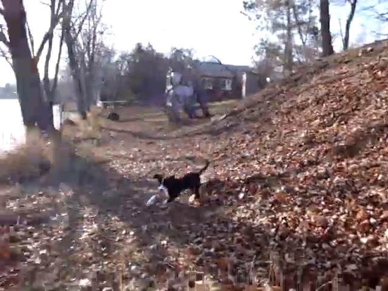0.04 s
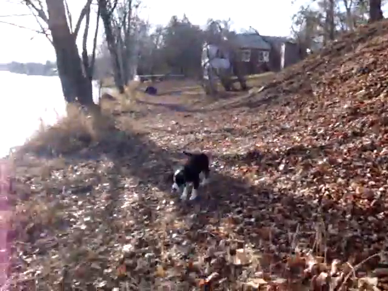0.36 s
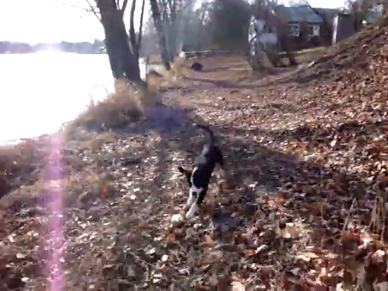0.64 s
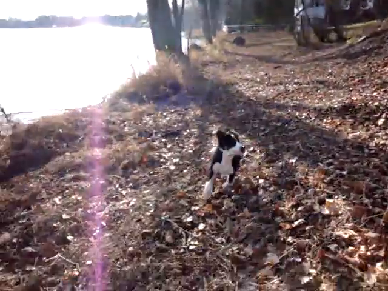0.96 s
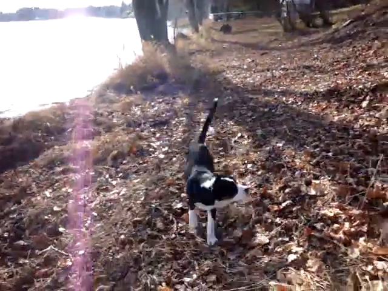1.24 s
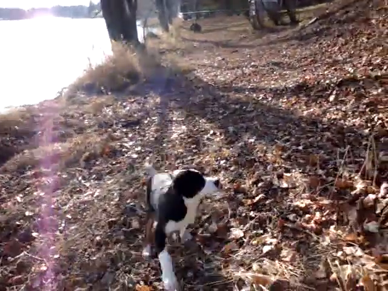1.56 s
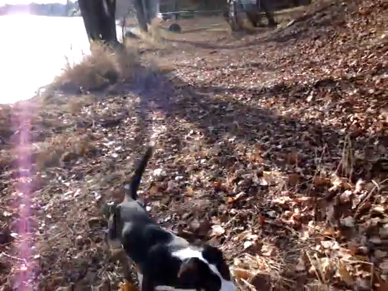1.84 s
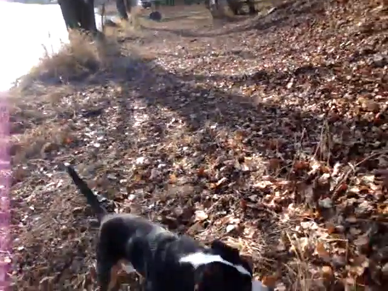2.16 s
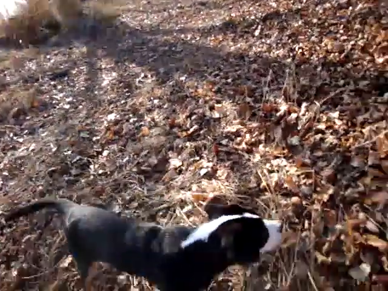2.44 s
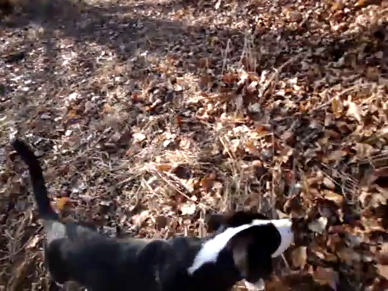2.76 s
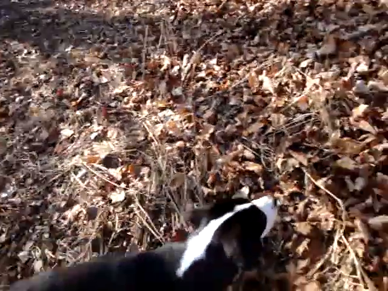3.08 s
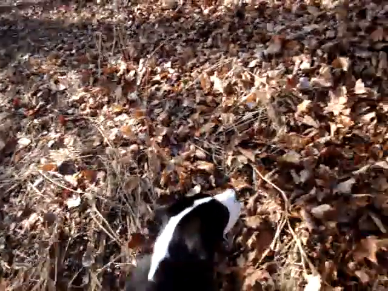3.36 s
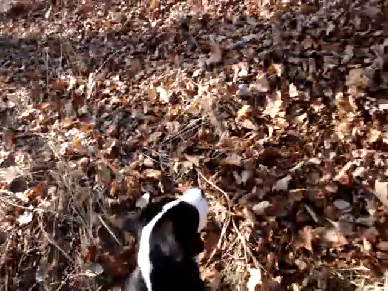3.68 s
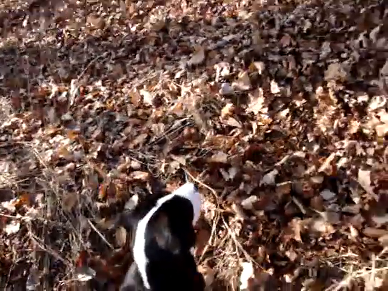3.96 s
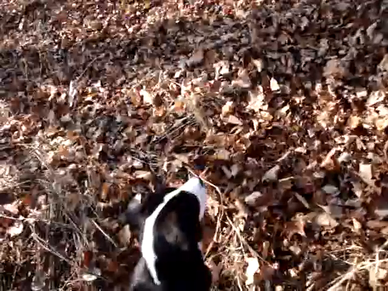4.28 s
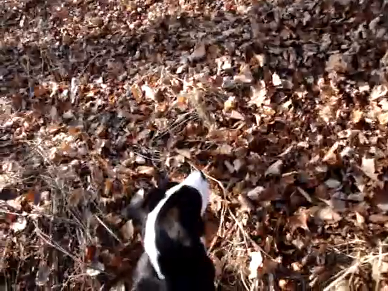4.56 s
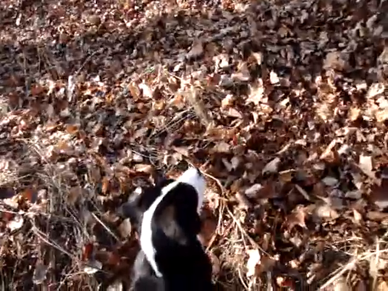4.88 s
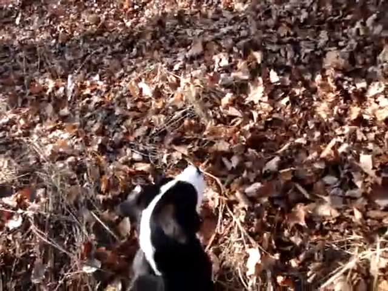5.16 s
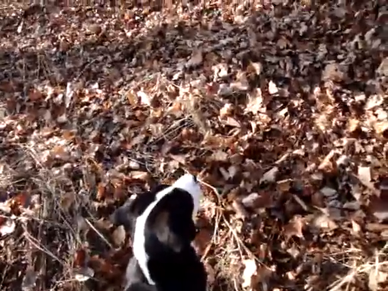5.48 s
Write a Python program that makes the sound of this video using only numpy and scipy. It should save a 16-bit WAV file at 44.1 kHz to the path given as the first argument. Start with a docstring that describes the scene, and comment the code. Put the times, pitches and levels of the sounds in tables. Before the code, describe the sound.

Outdoors, a dog trots through dry fallen leaves while a person walks to meet it. Uneven steps crunch and rustle, mixed with sharp little snaps of twigs and stalks. The crunching grows closer and louder, then stops after about four seconds. A few faint crackles and a soft bump on the microphone follow, over a low distant rush with no echo.

```python
"""On a path of dry fallen leaves, a dog trots up while its owner walks to meet it; then both stand still.
Each footfall crushes a heap of leaves into hundreds of tiny fractures, and stalks and twigs snap between.
Now and then a shoe thuds on the soil or a hand bumps the microphone.
A soft distant rush lies under the open air."""
import sys
import numpy as np
from scipy import signal
from scipy.io import wavfile

SR = 44100
rng = np.random.default_rng(int(sys.argv[2]) if len(sys.argv) > 2 else 0)


def to_wav(sig):
    """Store sig (one row per channel, or 1-D mono) as 16-bit WAV at the path in sys.argv[1].

    Samples outside -1..1 are clipped; the rate is SR.
    """
    pcm = np.clip(np.atleast_2d(sig), -1, 1) * 32767
    pcm = np.round(pcm).astype(np.int16)
    wavfile.write(sys.argv[1], SR, pcm.T)  # frames by channels


N = 243431
TIME = np.arange(N) / SR
CUTOFF_HZ = 10100

# The colour of breaking leaves. Each row: frequency in Hz, relative level in dB.
LEAF_COLOUR = [(150, -27), (300, -16.5), (450, -6), (620, -9.5), (1100, -3.5), (1450, -6), (1750, -4),
               (2150, -7), (2600, -1.5), (3250, 2.5), (4200, -0.5), (5200, 0), (6500, -0.5), (10000, -2)]


def from_db(db):
    """Decibels to gain."""
    return 10 ** (np.asarray(db) / 20)


def rms_one(x):
    """Scale to rms 1."""
    return x / np.sqrt(np.mean(x ** 2) + 1e-20)


def in_time(rows):
    """One automation curve for each column after the time column."""
    times, *columns = np.transpose(rows)
    return [np.interp(TIME, times, column) for column in columns]


def at_hz(points, hz):
    """Read a spectrum on a log-frequency axis."""
    frequencies, levels = np.transpose(points)
    return np.interp(np.log(hz), np.log(frequencies), levels)


def bands(lowest_hz):
    """Third-octave bands up to the cut-off, each as centre in Hz, width in Hz and filter."""
    edges = CUTOFF_HZ * 2 ** (np.arange(-27, 1) / 3) * 1.04
    return [(np.sqrt(a * b), b - a, signal.butter(2, [a, b], "band", fs=SR, output="sos"))
            for a, b in zip(edges, edges[1:]) if a > lowest_hz]


def resonate(x, hz, width_hz):
    """One resonance with unity gain at its peak."""
    r = np.exp(-np.pi * width_hz / SR)
    feedback = [1, -2 * r * np.cos(2 * np.pi * hz / SR), r * r]
    return signal.lfilter(np.array([1, 0, -1]) * (1 - r * r) / 2, feedback, x + 1e-18)


def flutter(per_s):
    """A random wander with rms 1."""
    knots = np.arange(0, TIME[-1] + 1, 1 / per_s)
    return rms_one(np.interp(TIME, knots, rng.standard_normal(N)[:len(knots)]))


def open_air(drone_hz=100, drone_width_hz=21, drone_db=-71):
    """A bed of distant rush, with a thin hiss on top and a faint low drone."""
    # The colour of the rush. Each row: frequency in Hz, relative level in dB.
    rush_colour = [(15, -38), (25, -24), (92, -3.5), (148, -0.5), (186, -3), (271, 1.5), (331, 2),
                   (506, 2.5), (701, 4), (901, 2.5), (1190, -3), (1350, -5.5), (2400, -11.5), (5340, -19),
                   (10000, -18.5)]
    # Its slow drift. Each row: time in seconds, level in dB.
    rush_levels = [(0, -49), (1, -50), (2.3, -51), (4, -53), (4.8, -52), (5.5, -52)]
    rush_db, = in_time(rush_levels)
    rush = sum(from_db(at_hz(rush_colour, hz)) * signal.sosfilt(band, rng.standard_normal(N))
               for hz, _, band in bands(lowest_hz=20))
    drone = resonate(rng.standard_normal(N), drone_hz, drone_width_hz)
    drone = resonate(drone, drone_hz, drone_width_hz)
    return from_db(rush_db) * rms_one(rush) + from_db(drone_db) * rms_one(drone)


def footfalls(press_s=0.023, ordinary_settle_s=0.032, rebound_db=-12, rebound_s=0.061):
    """Three envelopes for the leaves under the feet: low thrash, mid crunch and crisp top."""
    # Paws and shoes landing. Each row: moment of fullest press in seconds, crunch drive in dB,
    # settling time in seconds, then thrash and crisp top in dB against the crunch.
    steps = [(0.006, -42, 0.016, 7.5, -2), (0.113, -52, 0.079, 12, -6), (0.218, -42, 0.01, -10, -1),
             (0.44, -48, 0.034, 5, -1.5), (0.636, -39, 0.026, 2, -6), (0.672, -34.5, 0.023, 0.5, -2),
             (0.83, -47, 0.059, 7, -0.5), (0.97, -44.5, 0.043, -6, 0.5), (1.11, -39.5, 0.021, 3, -3),
             (1.124, -34, 0.017, 2.5, -1.5), (1.188, -31, 0.016, 4, -2.5), (1.21, -33, 0.025, 4.5, -4),
             (1.343, -35.5, 0.036, 3, -2), (1.439, -31, 0.013, -1.5, -6), (1.505, -36, 0.025, 4, -3),
             (1.558, -43.5, 0.014, 0, 3), (1.634, -36.5, 0.044, -0.5, -0.5), (1.712, -41.5, 0.032, 7, -2),
             (1.837, -42, 0.019, 0, -3), (1.936, -41.5, 0.064, -0.5, -2), (2.079, -47, 0.045, -14, -1.5),
             (2.18, -43, 0.029, 0, -3), (2.229, -39.5, 0.038, 2.5, -2), (2.442, -38.5, 0.017, 2.5, -2.5),
             (2.483, -37.5, 0.046, 0, -4), (2.664, -35.5, 0.041, -5, -6.5), (2.764, -46, 0.091, 4, -0.5),
             (2.846, -36, 0.019, -3, -4), (2.9, -27.5, 0.0085, -2, -2), (2.919, -26, 0.024, 0.5, -7.5),
             (2.963, -28.5, 0.03, -1, -9), (3.153, -31, 0.038, 4.5, -6), (3.32, -31, 0.027, -0.5, -1.5),
             (3.384, -30, 0.01, -2, -11), (3.409, -30.5, 0.059, -0.5, -6.5), (3.498, -30.5, 0.026, 7, -9),
             (3.586, -38.5, 0.0093, 4, -1), (3.635, -39.5, 0.093, -1, -7), (3.806, -38, 0.012, -10, -8),
             (3.846, -37, 0.046, 4, -7), (3.937, -37.5, 0.045, 0, -6.5), (4.02, -49.5, 0.02, -4, -8),
             (4.19, -59, 0.04, -2, -2), (4.3, -54.5, 0.037, -8, -7), (4.732, -57.5, 0.053, 0, -8),
             (5.085, -54.5, 0.037, 7, -8)]
    # Loose leaves pushed about between steps. Each row: time in seconds, crunch drive in dB.
    stirring = [(0.0, -47), (0.2, -50.5), (0.3, -47.5), (0.38, -56.5), (0.59, -54.5), (0.73, -42.5),
                (0.88, -47), (1.3, -47.5), (1.8, -47.5), (2.14, -55), (2.27, -46), (2.35, -51),
                (2.42, -57.5), (2.53, -44), (2.85, -43), (3.02, -37.5), (3.08, -40), (3.2, -37.5),
                (3.45, -38), (3.95, -54), (4.07, -55.5), (4.45, -61.5)]
    stir_db, = in_time(stirring)
    power = from_db([stir_db + 4, stir_db, stir_db - 5.5]) ** 2  # heavy lows, soft top
    for at_s, db, settle_s, thrash_db, crisp_db in steps:
        before, after = np.maximum(at_s - TIME, 0), np.maximum(TIME - at_s, 0)
        attack_s = press_s * (settle_s / ordinary_settle_s) ** 1.6  # short steps land far more abruptly
        # the foot sinks in, the crushed leaves settle and then spring back faintly
        press = np.exp(-np.minimum((before / attack_s) ** 2, 30))
        settle = np.exp(-np.minimum((after / settle_s) ** 1.5, 30))
        rebound = from_db(rebound_db) * np.exp(-after / rebound_s)
        envelope = press * np.maximum(settle, rebound)
        power += (from_db([[db + thrash_db], [db], [db + crisp_db]]) * envelope) ** 2
    return np.sqrt(power)


def fractures(per_s, spread_db):
    """Clicks at random moments, many small and a few large, with the same mean power at any rate."""
    sizes = from_db(spread_db * np.minimum(rng.exponential(1, N), 3.5))
    return sizes * (rng.random(N) < per_s / SR) / np.sqrt(per_s)


def crushed_leaves(thrash, crunch, crisp, cracks_per_s=2600, rub_db=-3, patchy_db=2.5, gain_db=-36.5):
    """Every fracture sounds in all bands with a colour of its own, over the hiss of leaf rubbing on leaf."""
    # The leaves ring lower and thinner on the far path, higher and with more body underfoot.
    # Each row: time in seconds, pitch factor, lift of the lows in dB.
    approach = [(0, 0.8, -1), (0.6, 0.79, 1), (1.2, 0.8, -2), (1.6, 0.88, 1), (2.6, 1.05, -1.5),
                (3.2, 0.94, -0.5), (4, 1.15, 3)]
    pitch, lows_db = in_time(approach)
    density = np.clip(crunch / from_db(-42), 0.5, 6)  # a harder press breaks more leaves at once
    cracks = fractures(cracks_per_s * density, spread_db=2)
    out = np.zeros(N)
    for hz, width_hz, band in bands(lowest_hz=120):
        crackle = rms_one(cracks * rng.standard_normal(N))
        rub = from_db(rub_db) * rng.standard_normal(N)
        texture = rms_one(signal.sosfilt(band, crackle + rub))
        # crossfade the three envelopes up the spectrum
        low_share = at_hz([(1300, 1), (2700, 0)], hz)
        top_share = at_hz([(4800, 0), (7500, 1)], hz)
        drive = low_share * thrash + (1 - low_share - top_share) * crunch + top_share * crisp
        shelf_db = lows_db * np.interp(hz, [500, 900], [1, 0])
        # each band's level flickers quickly at random, making the rustle patchy
        flicker_db = patchy_db * flutter(per_s=110)
        colour = from_db(at_hz(LEAF_COLOUR, hz / pitch) + shelf_db + flicker_db)
        out += drive * colour * np.sqrt(width_hz) * texture
    return from_db(gain_db) * out


def stiff_leaves(crunch, width_hz=330, gain_db=-7):
    """Stiff leaves that crack right through ring for a moment, each at a pitch of its own."""
    pitches_hz = np.linspace(900, 9000, 36)
    cracks = fractures(per_s=260, spread_db=1.5) * rng.choice([-1, 1], N)
    pitch_index = rng.integers(0, len(pitches_hz), N)
    rings = sum(resonate(cracks * (pitch_index == k), hz, width_hz) * from_db(at_hz(LEAF_COLOUR, hz))
                for k, hz in enumerate(pitches_hz))
    return from_db(gain_db) * crunch * rms_one(rings)


def leaf_litter(rustle, hollow_db=-6.5, clump_db=1.0):
    """The litter adds a hollow, woody note to every step and gives way in small irregular clumps."""
    hollow = from_db(hollow_db) * resonate(rustle, hz=1040, width_hz=280)
    clumps = from_db(clump_db * flutter(per_s=170))
    return (rustle + hollow) * clumps


def twig_snaps(jolt_db=-2.5, crack_db=-17, splinter_width_hz=950, energy_s=0.002):
    """A stalk gives way with one jolt, tears on for an instant and rings briefly."""
    # Stalks, twigs and stiff leaves breaking. Each row: start in seconds, level in dB with the energy
    # spread over energy_s, ring pitch in Hz, ring width in Hz, tearing time in seconds.
    breaks = [(0.0149, -35, 1150, 600, .0005), (0.056, -37, 990, 650, .0008),
              (0.187, -40, 1200, 500, .0005), (0.2125, -37, 4400, 5000, 0.003),
              (0.2496, -43, 3500, 2500, .0004), (0.265, -42, 3600, 3000, .0004),
              (0.6838, -29, 2600, 1800, 0.0017), (0.7145, -32.5, 2500, 3000, 0.00054),
              (1.005, -37, 4300, 3500, 0.00049), (1.0675, -38, 4000, 3500, .0003),
              (1.126, -26, 2900, 2000, 0.00072), (1.1331, -32, 1200, 900, .0005),
              (1.1521, -28, 1230, 600, .0005), (1.1881, -21.5, 3500, 2000, .0007),
              (1.2067, -25, 4200, 1600, .0018), (1.2162, -26.5, 3800, 1800, .0018),
              (1.2382, -37, 4300, 3000, .0004), (1.2604, -34.5, 2600, 2500, 0.00037),
              (1.313, -34, 4000, 3000, .0003), (1.3933, -33.5, 2600, 2500, 0.0033),
              (1.4326, -33, 3300, 2500, .001), (1.453, -36, 3800, 3000, 0.00033),
              (1.4995, -31, 4000, 3500, .0005), (1.5208, -32, 7500, 3500, .0004),
              (1.5555, -42, 4000, 3500, .0003), (1.5632, -41, 5600, 4000, .0003),
              (1.5706, -35, 4100, 3500, .0003), (1.6918, -33, 3500, 3000, .0003),
              (1.724, -35, 2900, 2500, 0.00039), (1.9396, -39, 3400, 2500, .0004),
              (2.0058, -38, 3700, 3000, .0004), (2.6604, -33, 4000, 2500, .0006),
              (2.92, -20.5, 3380, 1200, .002), (2.964, -28.5, 1510, 700, .001),
              (2.969, -32, 3400, 700, .001), (3.0093, -37, 3500, 6000, .0003),
              (3.0405, -30.5, 3180, 600, .0008), (3.0755, -28, 4770, 2500, 0.0011),
              (3.0976, -28, 4800, 4500, .0004), (3.2709, -22.5, 1100, 290, .0005),
              (3.3046, -26, 2300, 2200, .002), (3.3747, -23, 3100, 1900, .0005),
              (3.388, -25, 1100, 750, .0005), (3.581, -26.5, 3450, 1100, .001),
              (3.5854, -32, 4100, 2500, .0005), (3.61, -34, 1250, 600, .0006),
              (3.7372, -31, 4500, 950, .0006), (4.147, -40.5, 6900, 1600, .0025),
              (4.175, -45, 5500, 2200, .0012), (4.19, -45, 5200, 1800, .002),
              (4.219, -42, 4200, 2000, 0.0036), (4.283, -52, 5970, 2500, .0008),
              (5.0085, -44, 3850, 1500, 0.001), (5.062, -38, 3100, 320, .002),
              (5.073, -48, 2950, 350, .002), (5.228, -45, 3030, 340, .001),
              (5.2595, -45.5, 1100, 450, .0005)]
    out, t = np.zeros(N), TIME[:SR // 40]
    jolt = 1.0 * (t == 0)
    for start_s, db, hz, width_hz, tear_s in breaks:
        tear = rng.standard_normal(len(t)) * np.exp(-np.minimum((t / tear_s) ** 2, 60) / 2)
        push = from_db(jolt_db) * rms_one(jolt) + rms_one(tear)
        ring = resonate(push, hz, width_hz)
        splinters = rms_one(resonate(ring, hz, 2.4 * width_hz))  # steepens the ring's flanks
        spread = 1 + width_hz / hz
        knock_band = signal.butter(3, [hz / spread, hz * spread], "band", fs=SR, output="sos")
        knock = rms_one(signal.sosfilt(knock_band, jolt))
        # a wide ring splinters and cracks brightly, a narrow one knocks cleanly
        torn = min(width_hz / splinter_width_hz, 1) ** 4
        crack = from_db(crack_db) * rms_one(resonate(push, hz=4500, width_hz=6000))
        snap = (1 - torn) * knock + torn * (splinters + crack)
        start = int(start_s * SR)
        out[start:start + len(t)] += from_db(db) * snap * np.sqrt(energy_s * SR / np.sum(snap ** 2))
    return out


def thuds():
    """A soft, heavy contact swings for a cycle or two."""
    # A shoe on the soil or a hand on the microphone. Each row: centre in seconds,
    # envelope peak in dB, pitch in Hz, rise and fall time in seconds.
    contacts = [(0.033, -32.5, 216, 0.0025), (0.044, -43, 112, 0.012), (2.752, -37, 350, 0.0021),
                (3.099, -42, 166, 0.0039), (3.495, -46.5, 232, 0.01), (3.786, -47, 106, 0.005),
                (4.54, -36, 198, 0.0026), (4.555, -35, 172.7, 0.0073)]
    out = np.zeros(N)
    for centre_s, db, hz, fade_s in contacts:
        t = TIME - centre_s
        envelope = np.exp(-np.minimum((t / fade_s) ** 2, 50))
        out += from_db(db) * envelope * np.sin(2 * np.pi * hz * t)
    return out


def scene():
    """Steps, snaps and thuds over the open air, in mono, with no walls to throw them back."""
    thrash, crunch, crisp = footfalls()
    rustle = crushed_leaves(thrash, crunch, crisp) + stiff_leaves(crunch)
    mix = open_air() + leaf_litter(rustle) + twig_snaps() + thuds()
    return mix[None]


def record(dry):
    """A steep low-pass takes off the very top."""
    return signal.sosfilt(signal.ellip(12, 0.2, 80, CUTOFF_HZ, fs=SR, output="sos"), dry)


dry = scene()
out = record(dry)
to_wav(out)
```